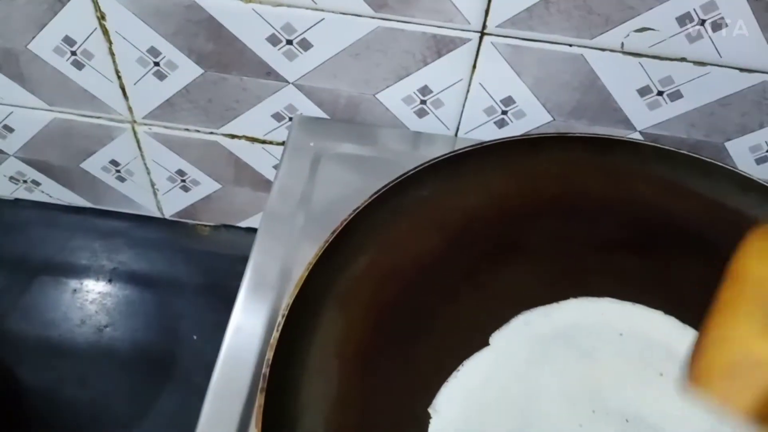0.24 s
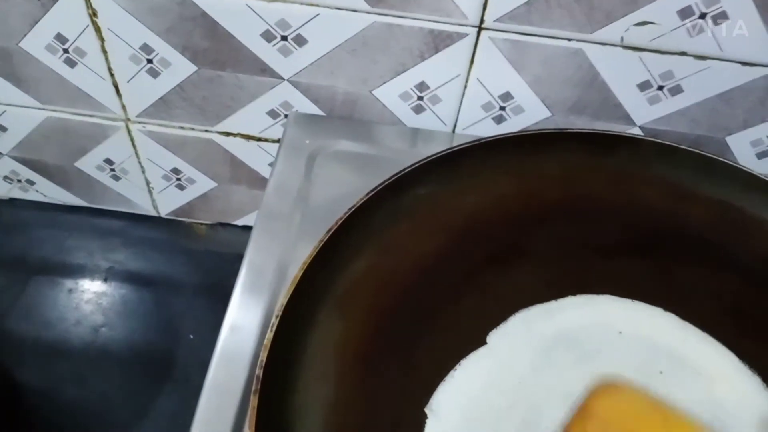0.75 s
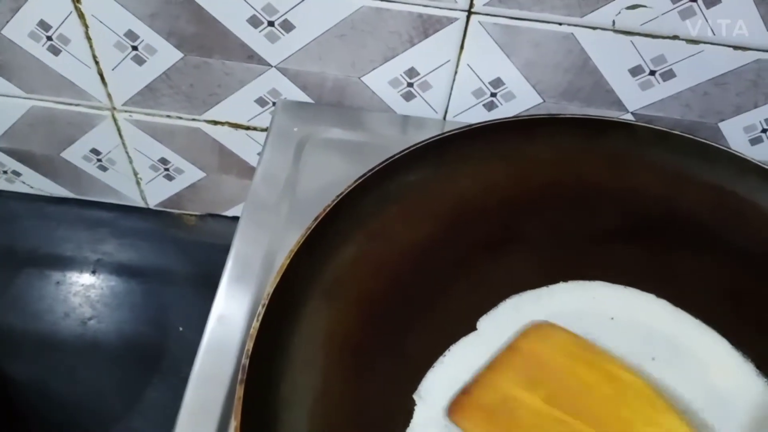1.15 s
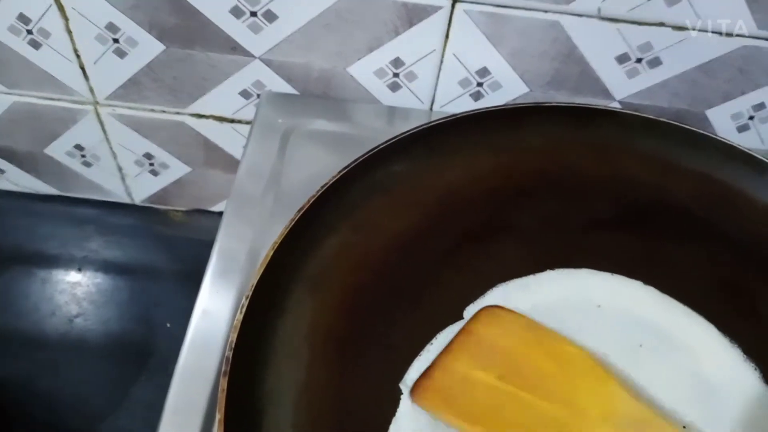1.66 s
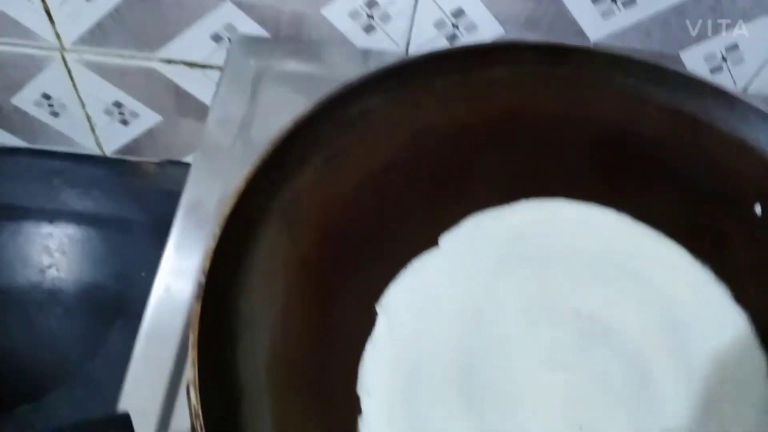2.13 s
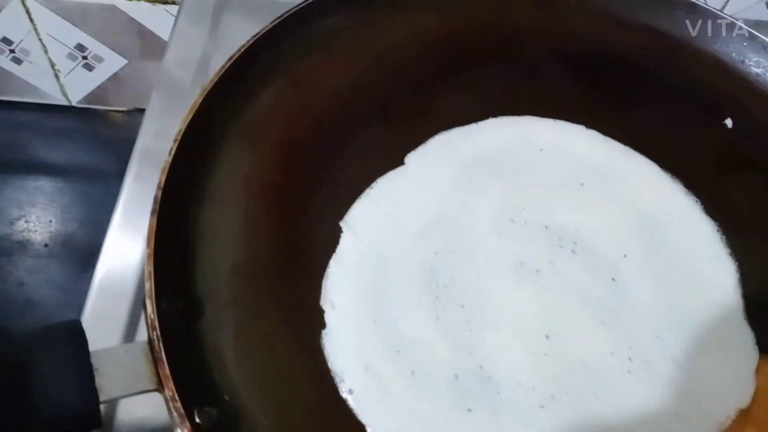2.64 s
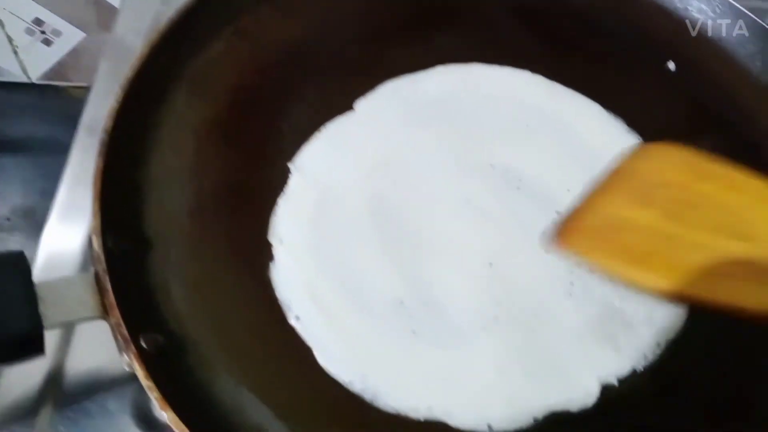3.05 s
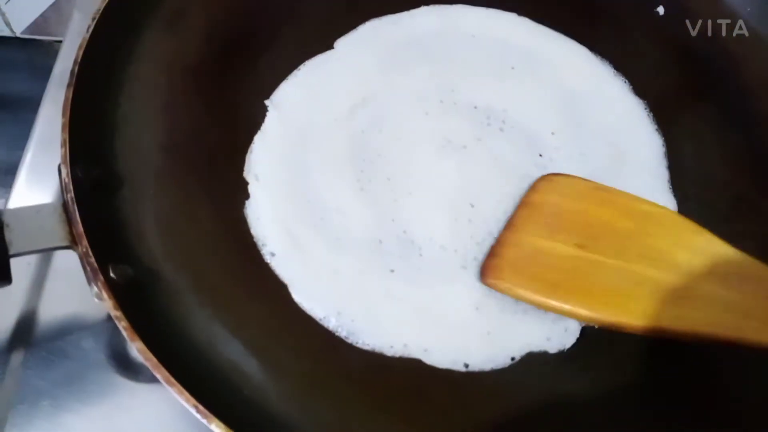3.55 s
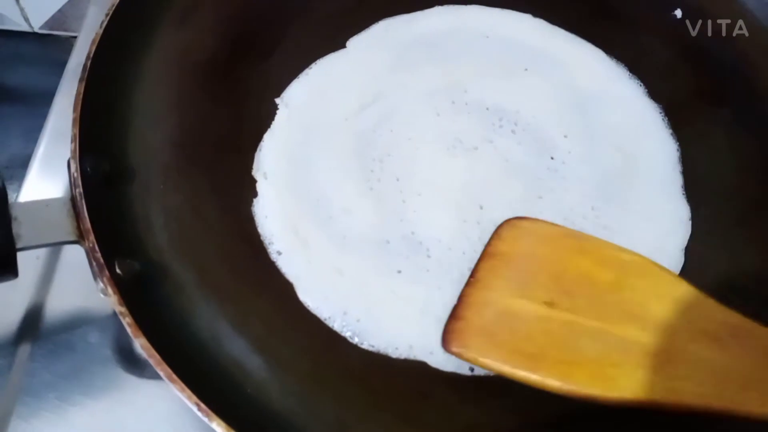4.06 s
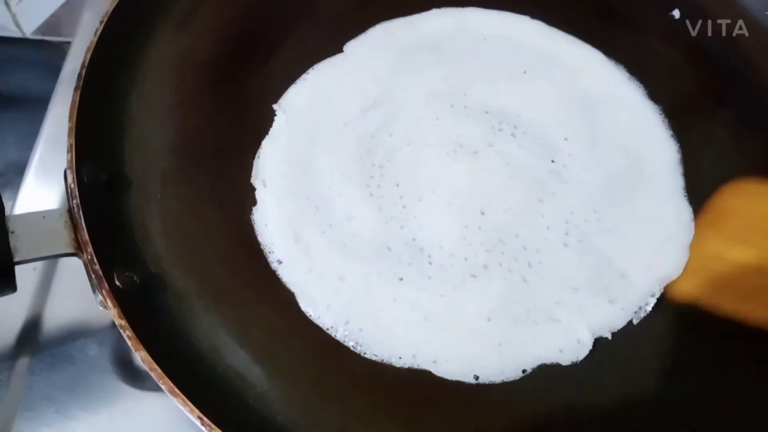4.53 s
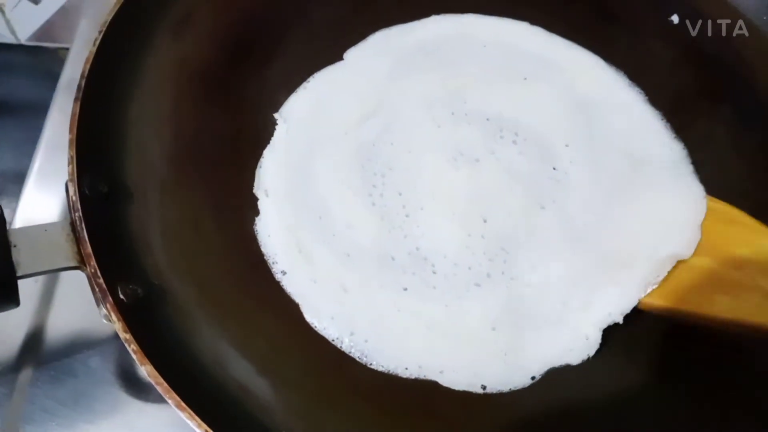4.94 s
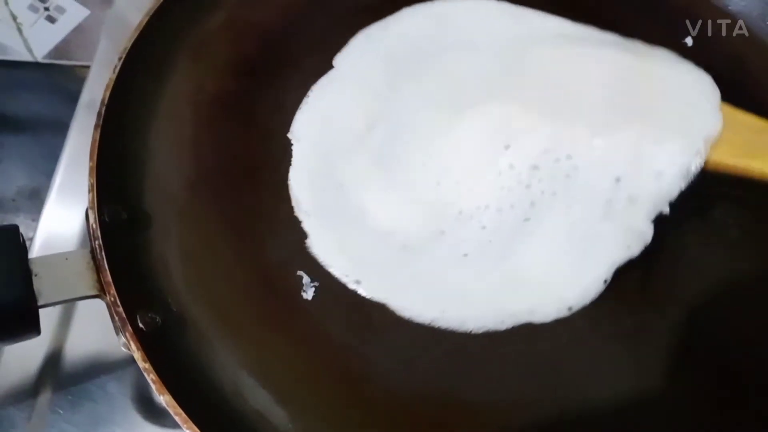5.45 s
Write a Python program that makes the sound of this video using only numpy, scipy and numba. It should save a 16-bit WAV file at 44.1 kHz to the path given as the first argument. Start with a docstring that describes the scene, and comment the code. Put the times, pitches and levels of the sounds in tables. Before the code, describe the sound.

Crisp hissing and ticking fat in a steel pan, with dull wood-on-metal knocks around two seconds and soft brushing strokes before and after. Past four seconds the blade slides under the crepe with a short, hollow, wavering scrape, then a last knock and rising sizzle. Close, almost mono pickup, slight tiled-room reflection, intermittent low drone beneath.

```python
"""A sharp, flickering sizzle and spitting fat: a thin crepe fries in an oiled steel pan in a tiled kitchen.
Steam is band-filtered noise with ticks of bursting bubbles; each spit is a decaying sine with a fizz of noise.
A wooden spatula pats and rubs the crepe (resonant friction noise), knocks the pan (decaying modes),
leaves thin rings, then scrapes under the crepe (noise and sparse slips through wavering resonances).
A low drone of narrow-band noise comes and goes over faint room noise."""
import sys
import numpy as np
from scipy import signal
from scipy.fft import rfft, irfft, next_fast_len
from scipy.io import wavfile
from scipy.ndimage import uniform_filter1d
from numba import njit

SR = 44100
rng = np.random.default_rng(int(sys.argv[2]) if len(sys.argv) > 2 else 0)


def file_out(sig):
    """Save sig as 16-bit WAV at sys.argv[1]."""
    # one column per channel
    cols = np.atleast_2d(sig).T
    # limit, then scale
    lim = np.clip(cols, -1, 1)
    pcm = np.round(lim * 32767).astype(np.int16)
    wavfile.write(sys.argv[1], SR, pcm)


N = 250973


def undb(db):
    """Decibel law: amplitude ratio from a level in dB."""
    return 10 ** (np.asarray(db) / 20)


def unit(x):
    """Normalization to an rms of 1."""
    return x / np.sqrt(np.mean(x ** 2))


def curve(table):
    """Linear interpolation of table columns over time; the first falls to -120 dB outside the table's span."""
    s, db, *rest = np.transpose(table)
    t = np.arange(N) / SR
    level = np.interp(t, [s[0] - .03, *s, s[-1] + .03], [-120, *db, -120])
    return [level] + [np.interp(t, s, column) for column in rest]


def swells(table, attack, release):
    """Energy summation of rows (start, length, dB, ..) that rise, hold and decay; one gain for each dB column."""
    t, power = np.arange(N) / SR, 0
    for s, length, *db in table:
        rise = np.clip((t - s) / attack, 0, 1) ** 2
        decay = np.exp(-np.maximum(t - s - length, 0) / release)
        power = power + undb(db)[:, None] ** 2 * (rise * decay) ** 2
    return np.sqrt(power)


def walk(rate):
    """Random modulation: random levels 1 / rate s apart, joined by straight slopes; rms 1."""
    k = int(SR / rate)
    held = np.repeat(rng.standard_normal(N // k + 3), k)
    return unit(uniform_filter1d(held, k)[k:N + k])


def grains(rate, spread_db):
    """Random impulse train: sparse clicks, rate a second on average, most of them small, none huge."""
    size_db = spread_db * np.minimum(rng.exponential(size=N), 4.5)
    return (rng.random(N) < rate / SR) * undb(size_db) * rng.standard_normal(N)


def colour(x, points):
    """Spectral shaping by (Hz, dB) points, joined along a logarithmic frequency axis."""
    hz, db = np.transpose(points)
    size = next_fast_len(N)
    f = np.arange(size // 2 + 1) * SR / size + 1
    gain = undb(np.interp(np.log(f), np.log(hz), db))
    return irfft(rfft(x, size) * gain, size)[..., :N]


def band(x, lo_hz, hi_hz):
    """Band-pass filtering between two edges."""
    sos = signal.butter(3, [lo_hz, min(hi_hz, .49 * SR)], "bandpass", fs=SR, output="sos")
    return signal.sosfilt(sos, x)


def patchy(x, lo_hz, hi_hz, count, flicker_db):
    """Independent modulation of narrow neighbouring bands, each flickering alone; rms 1."""
    edges = np.geomspace(lo_hz, hi_hz, count + 1)
    return unit(sum(band(x, lo, hi) * undb(flicker_db * walk(9)) for lo, hi in zip(edges, edges[1:])))


def ring(x, hz, t60):
    """Damped resonance: one mode that decays by 60 dB in t60 s after a blow."""
    w, r = 2 * np.pi * hz / SR, np.exp(-np.log(1000) / (t60 * SR))
    return signal.lfilter([0, np.sin(w)], [1, -2 * r * np.cos(w), r * r], x)


@njit
def sweep(x, hz, share):
    """Time-varying resonance: a band-pass whose centre can move; its width is a share of the centre."""
    y, band_state, low_state = np.empty(len(x)), 0., 0.
    for i in range(len(x)):
        g = np.tan(np.pi * hz[i] / SR)
        v = (band_state + g * (x[i] - low_state)) / (1 + g * (g + share))
        band_state = 2 * v - band_state
        low_state = low_state + 2 * g * v
        y[i] = share * v
    return y


def resonate(x, hz, share, second_share):
    """Cascaded resonance: two band-passes in series on one centre; rms 1."""
    return unit(sweep(sweep(x, hz, share), hz, second_share))


def tiles(x, t60=0.77, wet_db=-8):
    """Reverberation of the small tiled room: dense decaying noise whose upper band dies sooner."""
    t = np.arange(int(.6 * SR)) / SR
    noise = rng.standard_normal(len(t))
    low = band(noise, 236, 1390) * np.exp(-np.log(1000) * t / t60)
    high = 0.59 * band(noise, 1270, 4870) * np.exp(-np.log(1000) * t / (0.37 * t60))
    tail = (low + high) * np.minimum(t / 0.001, 1)
    tail = tail / np.sqrt(np.sum(tail ** 2))
    return x + undb(wet_db) * signal.fftconvolve(x, tail)[:len(x)]


def add(out, s, sound):
    """Superposition: adds a sound to the mix at s seconds."""
    i = int(s * SR)
    out[i:i + len(sound)] += sound[:N - i]


# Spectrum of the kitchen's room noise. Each row: frequency in Hz, relative spectral level in dB.
KITCHEN_SPECTRUM = [(18, -7), (45, 4), (108, 8.5), (234, -3.5), (292, 0.5), (636, -9.5), (1360, -10),
                    (2000, -15), (5500, -60)]


def kitchen_air():
    """Broadband ambient noise, mostly low, in bands that flicker apart."""
    noise = colour(rng.standard_normal(N), KITCHEN_SPECTRUM)
    return undb(-66.5) * patchy(noise, 20, 4000, count=8, flicker_db=2.5)


# Spectrum of the side hiss. Each row: frequency in Hz, relative spectral level in dB.
SIDE_SPECTRUM = [(30, 6), (1500, -18), (3000, -4), (5500, -19.5), (7500, -38), (9000, 16.5), (13000, -7),
                 (16000, -13)]
# Loudness of the side hiss. Each row: time in seconds, level in dB.
SIDE_LEVELS = [(0, -84), (2.5, -67), (3.2, -55.5), (5.3, -56), (5.69, -85)]


def side_hiss():
    """Interchannel difference: a faint patchy hiss, added on the left and subtracted on the right."""
    noise = colour(rng.standard_normal(N), SIDE_SPECTRUM)
    return undb(curve(SIDE_LEVELS)[0]) * patchy(noise, 31, 22000, count=12, flicker_db=3.0)


# Swells of the low drone. Each row: start in seconds, length in seconds, level in dB.
DRONE_SWELLS = [(0.0, 0.072, -50), (0.6, 0.22, -53.5), (0.86, 0.067, -54), (1.06, 0.18, -56),
                (1.49, 0.078, -59), (1.59, 0.16, -51), (1.78, 0.15, -44.5), (1.88, 0.25, -57),
                (2.25, .13, -45), (3.18, 0.21, -47), (3.58, .07, -52.5), (3.78, 0.24, -56),
                (4.02, 0.093, -42), (4.14, 0.17, -53.5), (4.29, .28, -48), (4.64, .08, -51.5),
                (4.78, 0.1, -54), (4.86, 0.069, -44), (4.95, 0.07, -51), (5.42, 0.061, -52.5),
                (5.63, 0.071, -51)]


def drone():
    """Narrow-band noise: two resonances in series at 94 Hz give a low hum that wavers."""
    hz, width_hz = 94, 22  # the width is that of the narrower resonance
    t60 = np.log(1000) / (np.pi * width_hz)
    hum = unit(ring(ring(rng.standard_normal(N), hz, t60), hz, t60 / 2))
    return swells(DRONE_SWELLS, attack=0.026, release=.02)[0] * hum


SCRAPE_ATTACK_S, SCRAPE_RELEASE_S = 0.015, 0.029  # shared by the rings and the scrape
# Thin rings that linger after the blade touches the pan.
# Each row: start in seconds, length in seconds, level in dB, mean frequency in Hz.
THIN_RINGS = [(0.0, 0.26, -65.5, 850), (2.413, 0.35, -63.5, 1180), (4.388, 0.11, -62, 545),
              (4.396, .11, -54, 2240), (5.14, 0.16, -70, 1187), (5.285, 0.31, -62, 1457)]


def rings():
    """Friction-excited resonance: noise through one narrow wavering resonance at a time."""
    out, noise = 0, rng.standard_normal(N)
    width_hz = 65  # of each of the two filters in series
    for s, length, db, hz in THIN_RINGS:
        wavering_hz = hz * (1 + 0.014 * walk(5))
        tone = resonate(noise, wavering_hz, width_hz / hz, width_hz / hz)
        out = out + swells([(s, length, db)], SCRAPE_ATTACK_S, SCRAPE_RELEASE_S)[0] * tone
    return out


# Pushes of the blade on the bare steel.
# Each row: start in seconds, length in seconds, lower resonances in dB, upper resonances in dB.
SCRAPE_PUSHES = [(4.4, 0.076, -46, -69), (4.49, 0.081, -52.5, -52), (4.62, 0.13, -60, -57),
                 (4.73, 0.069, -55, -47.5), (4.79, 0.16, -58, -62.5), (4.93, .11, -57.5, -55),
                 (5.03, 0.079, -51.5, -56.5), (5.12, .07, -67, -69)]
# Resonances of the blade. Each row: mean frequency in Hz, width of its first filter in Hz, relative level in dB.
BLADE_RESONANCES = [(544.2, 13.3, -2.5), (540, 220, -9.5), (890, 46, -4.5), (1180, 18, -13.5),
                    (1407, 51, -1), (1630, 420, 0), (2360, 190, -8.5), (2740, 62, -12.5), (3250, 71, -8)]


def scrape():
    """Stick-slip friction: dense slips of the blade edge; its resonances waver as the blade bends."""
    lower, upper = swells(SCRAPE_PUSHES, SCRAPE_ATTACK_S, SCRAPE_RELEASE_S)
    out = 0
    for hz, width, db in BLADE_RESONANCES:
        bent_hz = hz * (1 + 0.023 * walk(6))
        slips = rng.standard_normal(N) + unit(grains(300, 3.1))
        tone = resonate(slips, bent_hz, width / hz, 0.96 * width / hz)
        out = out + undb(db) * (lower if hz < 1250 else upper) * tone
    return out


# Strokes of the blade over the soft crepe. Each row: start in seconds, length in seconds,
# upper resonance level in dB, its frequency in Hz, lower resonance level in dB, its frequency in Hz, grit in dB.
RUB_STROKES = [(0.615, 0.19, -58.5, 1230, -58.5, 716, -63), (0.843, 0.093, -59.5, 1150, -61, 670, -53.5),
               (0.95, .19, -59.5, 1280, -79, 860, -52.5), (1.264, .22, -56.5, 1070, -55, 680, -59.5),
               (2.423, 0.066, -65, 1500, -59, 660, -63), (2.64, 0.066, -57, 1550, -67, 650, -65),
               (3.164, 0.1, -62.5, 1130, -66, 600, -59.5), (3.482, 0.13, -62.5, 1180, -74, 654, -53.5),
               (3.789, .11, -58, 1090, -78, 750, -49.5), (3.91, 0.037, -59, 1300, -65, 910, -60),
               (3.958, 0.058, -57, 1410, -71, 800, -61), (4.01, 0.047, -56, 1390, -78, 600, -46.5),
               (4.044, 0.069, -47, 1150, -55, 600, -49), (4.105, 0.12, -60, 1180, -56.5, 430, -52)]


def rubs():
    """Sliding friction: soft noise through two blurred resonances of blade and crepe."""
    out, noise = 0, rng.standard_normal(N) * undb(1.9 * walk(31.73))
    grit = unit(band(grains(1500, 1.27), 2830, 4460))  # crisp batter under the blade
    for s, length, db, hz, low_db, low_hz, grit_db in RUB_STROKES:
        gain = swells([(s, length, db, low_db, grit_db)], attack=0.048, release=0.03)
        upper = resonate(noise, np.full(N, 1. * hz), 0.42, 0.35)
        lower = resonate(noise, np.full(N, 1. * low_hz), 0.21, 0.13)
        out = out + gain[0] * upper + gain[1] * lower + gain[2] * grit
    return out


# Modes of the steel pan. Each row: frequency in Hz, relative strength in dB, decay time t60 in seconds.
PAN_MODES = [(199.3, 5, 0.3), (253, 11, 0.094), (284, 9.5, 0.3), (326, -5, 0.18), (388, 1, 0.12),
             (407.4, 12.5, 0.083), (545.4, -15, 0.41), (600, -16, 0.29), (669, -24.5, 0.26),
             (733, -36, 0.18), (855, -1.5, 0.085), (908, -8, 0.3), (1050, -8.5, 0.057), (1181, -0.5, 0.051),
             (1343, -4, 0.066), (1550, 3.5, 0.033), (1806, 6.5, 0.027), (2267, 3.5, 0.056),
             (2800, -8, 0.19), (3147, 9.5, 0.041)]
# Spatula knocks. Each row: start in seconds, nominal crack level in dB,
# relative level in dB of the thud at 150-480, 480-1300 and 1300-4500 Hz,
# most favoured frequency in Hz, time after the start in seconds at which the tail's fade is halfway.
SPATULA_KNOCKS = [(.0033, -11.5, -49.5, -33.5, -53, 480, 0.16), (1.580, -22.5, -41, -34, -35.5, 336, 0.68),
                  (1.801, -60, -40.5, -65, -70, 233, 0.044), (1.812, -16, -39, -29, -30.5, 211, 0.21),
                  (2.2135, -25.5, -46.5, -33, -35.5, 617, 0.21), (4.05, -55, -62, -75, -60, 196, 0.2),
                  (4.387, -27.5, -59, -34.5, -38, 1360, 0.17), (5.5711, -30, -71, -25, -26, 1806, 0.09)]


def knocks():
    """Impact excitation, wood on damped steel: a crack, brief modes and a dull body, smeared by the tiles."""
    out, t = np.zeros(N), np.arange(int(.4 * SR)) / SR
    for s, db, bass_db, mid_db, high_db, best_hz, tail in SPATULA_KNOCKS:
        click = np.sin(2 * np.pi * 3000 * t) * np.exp(-t / 0.00034)
        rattle = band(rng.standard_normal(len(t)), 1800, 7300)
        rattle = rattle * (.5 * np.exp(-t / 0.0027) + 0.083 * np.exp(-t / 0.041))
        sound = undb(db) * (1.16 * click + rattle)
        for lo, hi, group_db in [(150, 480, bass_db), (480, 1300, mid_db), (1300, 4500, high_db)]:
            modes = 0
            for hz, mode_db, t60 in [m for m in PAN_MODES if lo < m[0] < hi]:
                near_db = 8 * np.exp(-(np.log2(hz / best_hz) / 0.24) ** 2)  # where the blow lands favours one mode
                blow = 1. * (t == t[rng.integers(40)])  # the modes start a little apart
                strength_db = mode_db + near_db + 1.5 * rng.standard_normal()
                modes += undb(strength_db) * ring(blow, hz, t60)
            body = undb(7.0) * unit(band(rng.standard_normal(len(t)), lo, hi)) * np.exp(-t / 0.0046)
            sound += undb(group_db) * (modes + body) / 2
        fade = 1 / (1 + np.exp((t - tail) / 0.058))  # the tail stops short
        add(out, s, tiles(sound, wet_db=-3.5) * fade)
    return out


# The louder spits of fat. Each row: start in seconds, nominal click level in dB, click frequency in Hz,
# nominal level of the top treble in dB.
LOUD_SPITS = [(0.1818, -29, 2960, -37), (0.259, -34, 5600, -35), (0.3348, -30.5, 2560, -39),
              (0.411, -43, 5300, -31), (0.485, -34, 2420, -50), (0.684, -43, 4220, -33),
              (0.7254, -23.5, 2800, -54), (0.794, -40, 5400, -33.5), (0.893, -31, 4530, -34),
              (0.9677, -22.5, 4480, -46), (0.9727, -21.5, 3450, -48), (0.988, -26, 5000, -45),
              (1.1015, -27, 5240, -41), (1.1816, -43, 5800, -29.5), (1.2073, -35.5, 4650, -30),
              (1.2855, -29.5, 2500, -46), (1.3195, -30.5, 5600, -48), (1.386, -38, 5840, -35),
              (1.394, -35, 6600, -34), (1.405, -43, 4700, -30), (1.4092, -38, 6400, -33),
              (1.427, -38, 5500, -33), (1.5306, -36, 6140, -33), (1.8034, -38, 4200, -26.5),
              (1.8623, -32, 6130, -25.5), (1.871, -20.5, 7300, -21), (1.943, -27.5, 3800, -46),
              (2.086, -51, 5600, -31), (2.1202, -38, 3780, -55), (2.4366, -27, 6700, -25),
              (2.4748, -31.5, 4600, -46), (2.594, -33, 4200, -30), (2.6456, -20, 6140, -38),
              (2.791, -29, 5700, -29), (3.086, -48, 5840, -35), (3.033, -37, 5540, -55),
              (3.1268, -35, 4830, -36), (3.3514, -35, 5300, -55), (3.4984, -30, 5350, -60),
              (3.6224, -42, 6100, -30.5), (3.891, -36, 4000, -55), (4.042, -30.5, 3940, -55),
              (4.2049, -23, 3600, -51), (4.6577, -30.5, 5360, -43), (4.712, -32.5, 3700, -50),
              (4.886, -29.5, 4400, -46), (5.122, -32, 4630, -36), (5.4345, -31, 5300, -33),
              (5.463, -35, 5720, -29), (5.5258, -25.5, 5200, -24), (5.533, -24, 5660, -41),
              (5.6668, -24, 5060, -19.5), (5.681, -29, 4400, -40)]


def small_spits():
    """Random arrivals: 3 small spits a second on average, in rows like those of the louder ones."""
    rows = []
    for when, size, pitch, edge in rng.random((int(3 * N / SR), 4)):
        rows.append((when * N / SR, -46 + 6 * size, 5300 * (.8 + .4 * pitch), -46 + 6 * edge))
    return rows


def spits():
    """Transient bursts: each a click of a cycle or two, with a short fizz of spray behind it."""
    out, t = np.zeros(N), np.arange(4000) / SR
    for s, db, hz, top_db in [*LOUD_SPITS, *small_spits()]:
        click = undb(db + 4) * np.sin(2 * np.pi * hz * t) * np.exp(-t * hz * 0.89)
        click += undb(top_db + 3) * np.sin(2 * np.pi * 14000 * t) * np.exp(-t / .0004)
        spray = band(rng.standard_normal(len(t)), 1100, 17000) * np.exp(-t / 0.0055)
        fizz_db = max(db, top_db) - 14
        add(out, s, click + undb(fizz_db) * spray)
    return band(out, 1600, 17000)


# The steady sizzle. Each row: time in seconds, level of the hiss in dB,
# its top treble against that in dB, level of its low edge in dB.
SIZZLE_LEVELS = [(0.0, -38.5, 7, -29), (0.06, -49, -2.5, -46), (0.16, -59, -4, -60), (0.22, -55.5, 0, -59),
                 (0.65, -53, 0, -55), (1.25, -54.5, 1.5, -57), (2.05, -56, 1, -56), (2.55, -53, 0.5, -56.5),
                 (2.84, -56, -1, -68.5), (2.94, -59.5, 1, -67.5), (3.05, -57, 2.5, -68.5),
                 (3.26, -56, -2, -65), (3.42, -56, -3, -74), (3.77, -56, -2, -69), (4.36, -57, 1, -68.5),
                 (4.7, -50.5, -0.5, -66), (5.0, -49, -4.5, -63), (5.2, -55, -1.5, -67),
                 (5.5, -49.5, 4, -81), (5.69, -44, 2.5, -47)]
# Flares of the sizzle where fat is pressed out. Each row: start in seconds, length in seconds,
# hiss in dB, top treble in dB, low edge in dB.
FAT_FLARES = [(0.38, 0.052, -57, -48, -62), (0.9, 0.21, -45.5, -48, -48), (1.355, 0.064, -49.5, -37.5, -57),
              (1.8, 0.056, -49.5, -41.5, -60), (1.85, 0.019, -46, -34.5, -66),
              (2.25, .12, -50.5, -49.5, -76), (2.42, 0.037, -57, -46, -71), (2.59, 0.097, -52, -47.5, -53),
              (2.78, 0.017, -51, -50, -61), (3.62, 0.022, -60, -47, -61), (3.91, .04, -68, -60, -53),
              (3.97, 0.052, -74, -68, -50), (4.49, 0.058, -47, -61, -55), (4.73, 0.05, -44.5, -52, -48)]
# Spectrum of the steam hiss. Each row: frequency in Hz, relative spectral level in dB.
STEAM_SPECTRUM = [(1200, -8), (1700, -8), (2200, 6), (3100, -1), (4200, 1), (4800, -4), (6500, -0.5),
                  (8500, -1.5)]


def sizzle():
    """Turbulence noise of steam in flickering bands, and fine ticks of bursting bubbles over it."""
    db, top_db, low_db = curve(SIZZLE_LEVELS)
    steady = undb([db, db + top_db, low_db])
    gain = np.hypot(steady, swells(FAT_FLARES, attack=0.034, release=0.019))
    steam, ticks = rng.standard_normal(N), unit(grains(900, 3.0))
    body = colour(steam, STEAM_SPECTRUM)
    low = patchy(body, 1200, 3000, count=8, flicker_db=2.2) + undb(-8) * unit(band(ticks, 1800, 3000))
    mid = patchy(body, 3000, 8300, count=12, flicker_db=2.2) + undb(-6) * unit(band(ticks, 3000, 8300))
    bright = steam + undb(-2.0) * ticks
    flickering_top = unit(band(bright, 11700, 18600)) * undb(0.81 * walk(23))
    top = undb(-1.5) * unit(band(bright, 9080, 10460)) + flickering_top
    surge = undb(1.2 * walk(16))
    return surge * (gain[0] * unit(mid) + gain[1] * top + gain[2] * low)


def scene():
    """Superposition of all sources, nearly mono: only the side hiss differs between the channels."""
    mid = kitchen_air() + drone() + rings() + scrape() + rubs() + knocks()
    mid = mid + tiles(spits(), wet_db=-5.0) + sizzle()
    side = side_hiss()
    return np.array([mid + side, mid - side])


# Response of the microphone port. Each row: frequency in Hz, gain in dB.
PORT_RESPONSE = [(25, -25), (70, -20.5), (100, -8.5), (7300, 2.5), (8300, -8), (9400, -23), (11300, -13),
                 (12500, -3.5), (14500, 3.5), (15500, -0.5)]


def record(dry):
    """Linear filtering: the microphone port leaves a deep dip under a treble peak; the top is cut at 15.7 kHz."""
    low_pass = signal.ellip(10, .2, 80, 15700, fs=SR, output="sos")
    return signal.sosfilt(low_pass, colour(dry, PORT_RESPONSE))


dry = scene()
out = record(dry)
file_out(out)
```